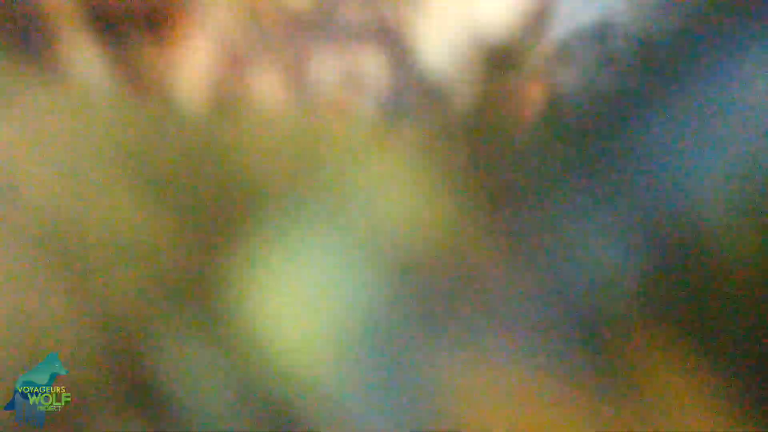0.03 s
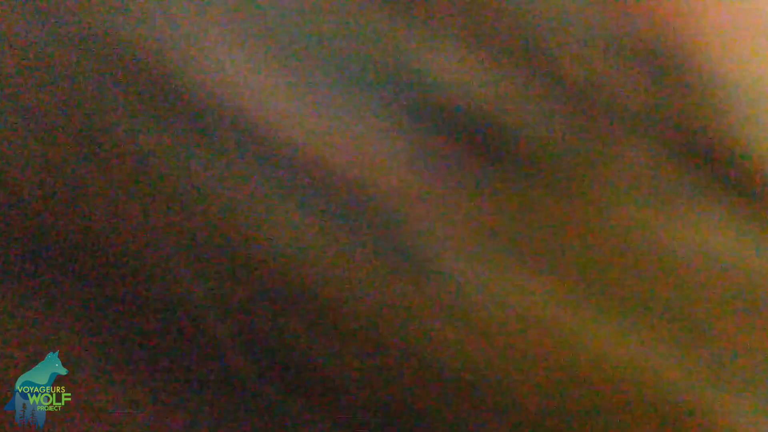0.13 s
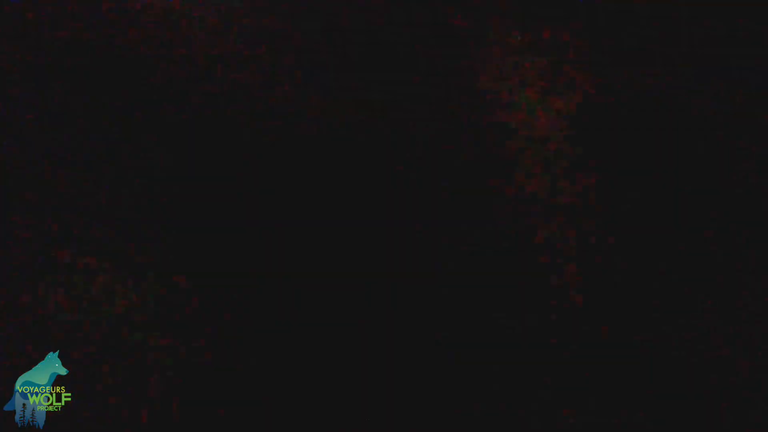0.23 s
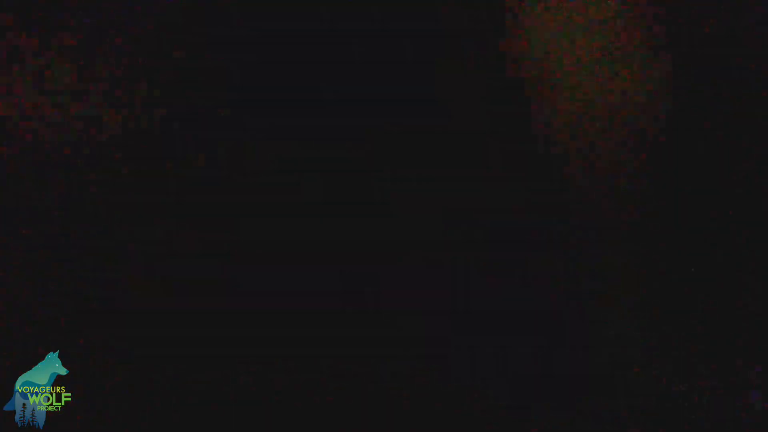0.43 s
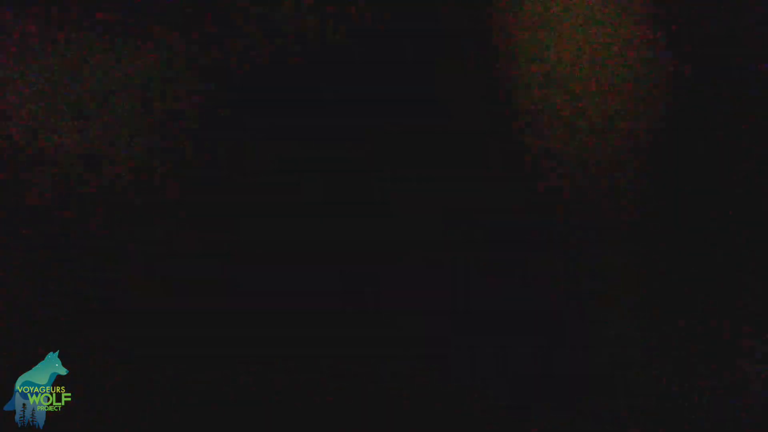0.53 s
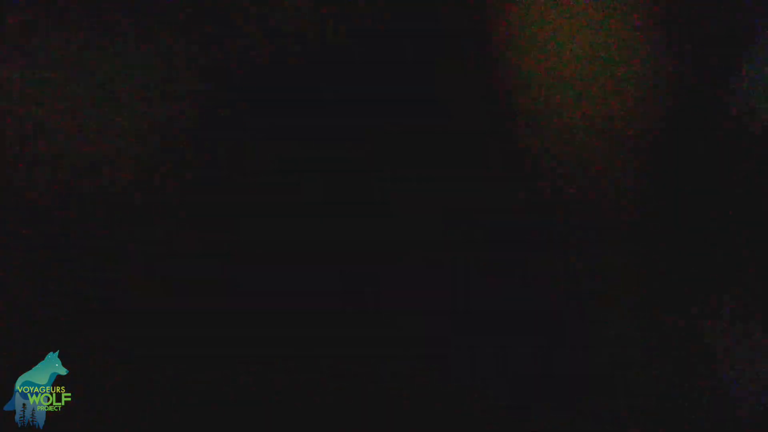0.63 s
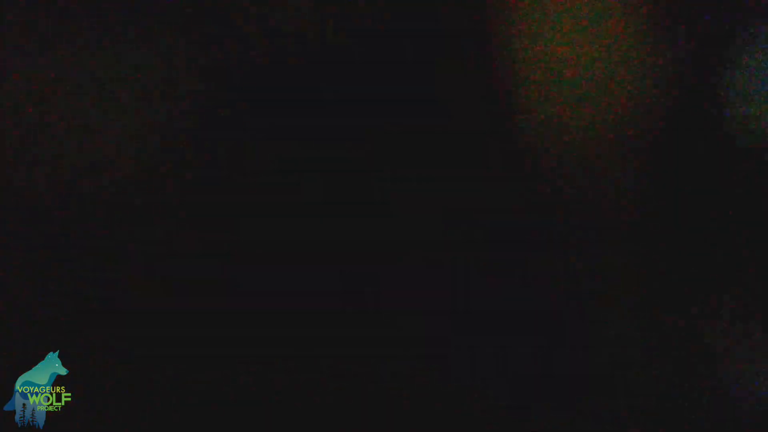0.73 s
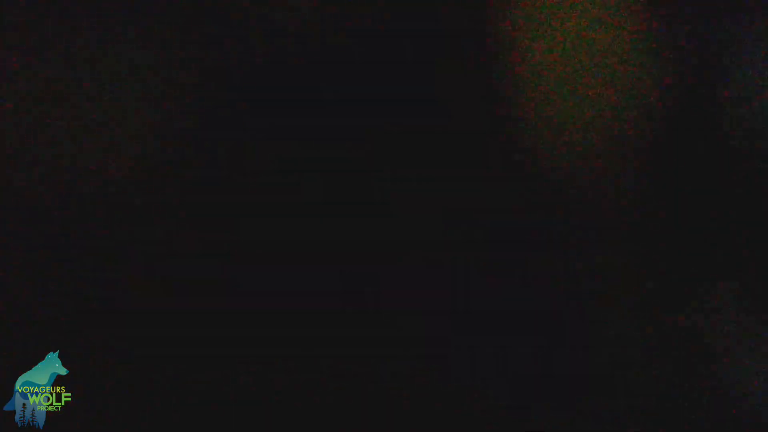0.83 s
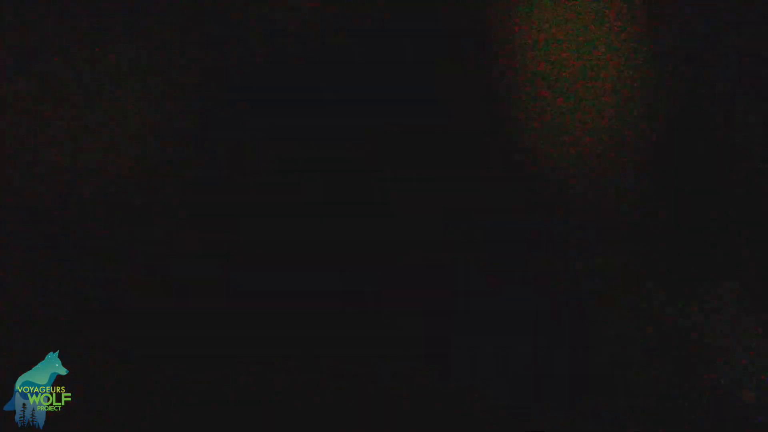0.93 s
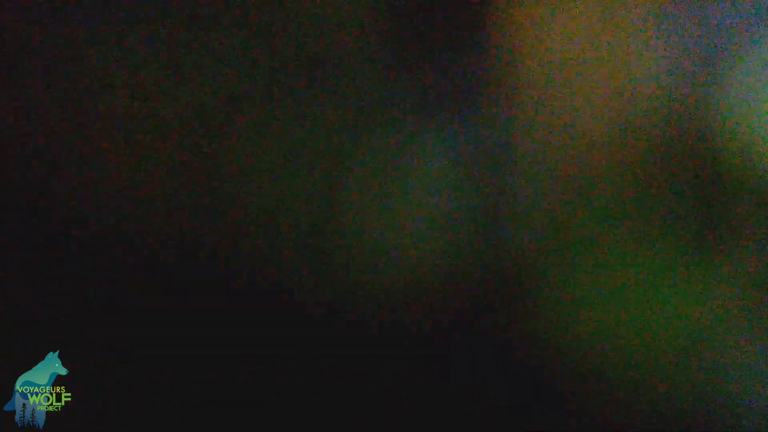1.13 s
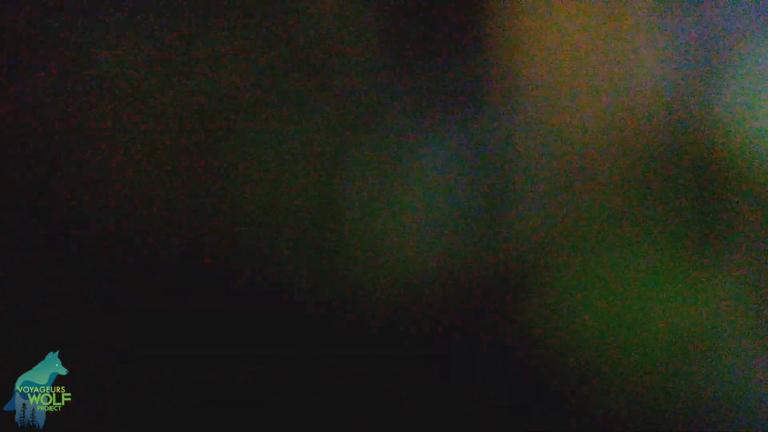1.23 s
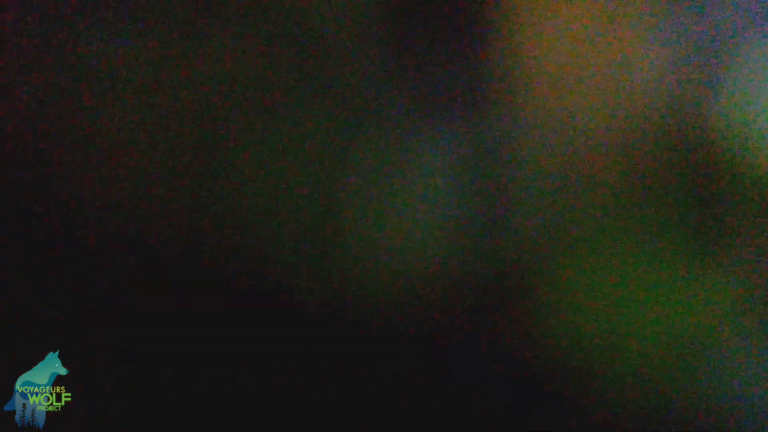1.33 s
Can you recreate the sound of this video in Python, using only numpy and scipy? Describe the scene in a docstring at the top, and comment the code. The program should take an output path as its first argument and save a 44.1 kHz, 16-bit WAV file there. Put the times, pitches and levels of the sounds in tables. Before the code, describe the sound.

A single sharp knock on a camera's plastic case, heard through its own microphone. Fingers rub and tap lightly from about 0.1 seconds. At 0.2 seconds the loud knock lands, ringing briefly and slightly overloading. Dry rubbing, dull thuds and light taps follow until 0.4 seconds, with faint ticks until 0.5. A low steady hiss and a barely audible high electronic whine run throughout and remain to the end.

```python
"""A knock on a camera

A hand shifts on a camera, then one sharp knock rings its plastic case and overloads the microphone.
Skin rubs as it sticks and slips, fingers tap and push with dull thuds, and small loose parts tick.
Under it all lie a steady low hiss and a faint electronic whine."""
import sys
import numpy as np
from scipy import signal
from scipy.fft import rfft, irfft
from scipy.io import wavfile

SR = 44100
rng = np.random.default_rng(int(sys.argv[2]) if len(sys.argv) > 2 else 0)


def dump(signal):
    """Clip the signal to [-1, 1] and save it as 16-bit WAV at the path in sys.argv[1]."""
    limited = np.clip(np.atleast_2d(signal).T, -1, 1)
    pcm = np.round(limited * 32767).astype(np.int16)
    wavfile.write(sys.argv[1], SR, pcm)


N = 61739
TIME = np.arange(N) / SR
RING_TIME = TIME[:SR // 6]  # seconds since a hit


def amp(db):
    """Turns decibels into a number to multiply by."""
    return 10 ** (np.asarray(db) / 20)


def unit(x):
    """Scales a sound to an average strength (rms) of 1."""
    return x / np.sqrt(np.mean(x ** 2) + 1e-20)


def level(points):
    """A volume curve through (t/s, level/dB) points, silent outside them."""
    return amp(np.interp(TIME, *np.transpose(points), left=-200, right=-200))


def colour(x, points):
    """Shapes bass and treble along (f/Hz, level/dB) points, at strength 1."""
    hz, db = np.transpose(points)
    f = np.fft.rfftfreq(len(x), 1 / SR)
    gain = amp(np.interp(np.log(f + 1), np.log(hz + 1), db))
    return unit(irfft(rfft(x) * gain, len(x)))


def resonance(hz, width_hz):
    """The feedback numbers of a filter that rings at one pitch."""
    r = np.exp(-np.pi * width_hz / SR)
    return [1, -2 * r * np.cos(2 * np.pi * hz / SR), r * r]


def band(x, hz, width_hz):
    """Keeps the sound near one pitch, at strength 1."""
    return unit(signal.lfilter([1, 0, -1], resonance(hz, width_hz), x))


def soften(x, hz):
    """Turns down the treble above hz."""
    return signal.lfilter(*signal.butter(2, hz, fs=SR), x)


def cut_bass(x, hz):
    """Turns down the bass below hz."""
    return signal.lfilter(*signal.butter(2, hz, "high", fs=SR), x)


def add(mix, start_s, sound):
    """Adds a sound to the mix at a given time."""
    part = mix[round(start_s * SR):][:len(sound)]
    part += sound[:len(part)]


def fade(t60):
    """Dies away by 60 dB in t60 seconds."""
    return np.exp(-np.log(1000) * RING_TIME / t60)


def hiss():
    """A steady, low background hiss."""
    # tone of the hiss: f/Hz, level/dB
    hiss_colour = [(25, -32), (60, -20.5), (100, -16.5), (200, -9), (330, -5.5), (500, -1), (950, 0),
                   (1600, -3), (2500, -8), (3500, -17), (5000, -31), (6500, -41), (8500, -47.5),
                   (14000, -43.5), (16000, -60.5)]
    return amp(-55) * colour(rng.standard_normal(N), hiss_colour)


def whine():
    """A thin electronic tone whose pitch wavers slightly."""
    waver = unit(soften(rng.standard_normal(N), hz=68))
    pitch_hz = 7805 + 28 * waver
    return amp(-93.5) * unit(np.sin(2 * np.pi * np.cumsum(pitch_hz) / SR))


def case_ring(hollow_db=0):
    """The plastic case rings after one touch; hollow_db turns its lowest note up or down."""
    # the case's own notes: f/Hz, level/dB, fade time t60/s
    case_notes = [(664.5, -12.5, .032), (776, -17, 0.083), (965, -8, 0.022), (1103, -8.5, 0.028),
                  (1217, -16, 0.089), (1420, 1.5, 0.011), (1510, -21, 0.02), (1774, 0, 0.016),
                  (1980, -21.5, 0.04), (2520, -28.5, 0.032), (2775, -10, 0.021), (3400, -16, 0.0293),
                  (3950, -25, 0.054)]
    notes = [amp(db) * fade(t60) * np.sin(2 * np.pi * hz * RING_TIME) for hz, db, t60 in case_notes]
    ring = cut_bass(amp(hollow_db) * notes[0] + sum(notes[1:]), hz=544)
    # bending waves in the plastic spread the first swing over a millisecond
    spread = resonance(hz=1366, width_hz=607)
    return signal.lfilter(spread[::-1], spread, ring)


def rubbing():
    """Skin sticks and slips on the case: many tiny jolts make it ring, rumble and scratch."""
    # pressure of the hand: t/s, level/dB
    pressure = [(.05, -72), (.112, -49.5), (.123, -38), (.148, -37.5), (.159, -53), (.2, -58.5),
                (.210, -37), (.236, -40), (.25, -45), (.277, -38.5), (.301, -44.5), (.313, -64),
                (.345, -62), (.42, -60)]
    # tone of the grip's low rumble: f/Hz, level/dB
    rumble_colour = [(25, -2.5), (70, -7), (200, -3), (400, -26), (1000, -40), (16000, -91)]
    # tone of the skin's dry scratch: f/Hz, level/dB
    scratch_colour = [(300, -24), (2000, 3.5), (3500, 3), (5800, -5.5), (7500, -17), (12000, -22.5),
                      (15500, -25.5)]
    # loudness of that scratch: t/s, level/dB
    scratch_level = [(.08, -85), (.125, -58.5), (.16, -73.5), (.186, -71), (.2, -45.5), (.23, -50.5),
                     (.277, -53.5), (.29, -63), (.338, -60.5), (.37, -77), (.55, -79)]
    slips_per_s, spread_db = 3500, 4.5
    slips = (rng.random(N) < slips_per_s / SR) * rng.choice([-1, 1], N)
    slips = slips * amp(spread_db * np.minimum(rng.exponential(1, N), 2))  # some jolt harder
    ring = unit(soften(signal.fftconvolve(slips, case_ring())[:N], hz=900))
    rumble = amp(-22) * colour(slips, rumble_colour)
    scratch = colour(slips, scratch_colour)
    return (ring + rumble) * level(pressure) + scratch * level(scratch_level)


def blows():
    """Each blow cracks and rings the case, with its own loudness and brightness."""
    # light taps, and a knock of three hits within 3 ms:
    # t/s, level/dB, treble cut-off/Hz, boost of the lowest note/dB
    hits = [(0.1221, -33, 1500, 0), (.1330, -30.5, 915, 5.5), (.1422, -31, 800, 5), (.2152, -10, 3300, 7),
            (0.2163, -2, 2500, 3.5), (.21823, -10, 2690, -6), (0.2595, -27.5, 1200, -16),
            (.2672, -32.5, 1480, -9), (.2944, -32.5, 1400, -11), (.3060, -34, 4500, -1),
            (.3810, -31, 1500, 11)]
    # tone of the crack: f/Hz, level/dB
    crack_colour = [(100, -6.5), (1500, -7.5), (3000, -17), (3900, -11.5), (4400, -17.5), (5100, 3.5),
                    (5800, -0.5), (6600, -14.5), (10000, -2.5), (12500, 3.5), (15500, 8)]
    out = np.zeros(N)
    for start_s, db, cutoff_hz, hollow_db in hits:
        noise = rng.standard_normal(len(RING_TIME))
        crack = amp(1) * colour(noise, crack_colour) * fade(t60=0.0219)
        add(out, start_s, amp(db) * soften(case_ring(hollow_db) + crack, cutoff_hz))
    return out


def pushes():
    """The whole camera gives under the hand with a short, low thud."""
    # pushes of the hand: t/s, level/dB
    shoves = [(0.143, -47), (0.2174, -14), (0.273, -39), (.2770, -23.5), (0.2863, -24.5)]
    thud_hz, rise_s = 189, 0.0015
    rise = 1 - np.exp(-RING_TIME / rise_s)
    thud = rise * fade(t60=0.014) * np.sin(2 * np.pi * thud_hz * RING_TIME)
    out = np.zeros(N)
    for start_s, db in shoves:
        add(out, start_s, -amp(db) * thud)
    return cut_bass(out, hz=110)


def ticks():
    """Small loose parts snap and ring briefly, each at its own pitch."""
    # ticks of the parts: t/s, level/dB, f/Hz, fade time t60/s
    loose_parts = [(0.1881, -38.5, 3500, 0.0099), (0.2526, -52, 4220, .012), (0.2756, -45.5, 5460, 0.011),
                   (0.3056, -39, 5100, 0.012), (0.3445, -51.5, 5000, 0.012), (0.344, -48.5, 10400, 0.0083),
                   (0.4031, -62, 7800, 0.0086), (0.4075, -58, 6140, 0.014), (0.4653, -65, 4740, 0.011),
                   (0.5119, -49, 6600, .01)]
    out = np.zeros(N)
    for start_s, db, hz, t60 in loose_parts:
        noise, snap = rng.standard_normal((2, len(RING_TIME)))
        width_hz = 0.26 * hz
        ring = band(band(noise, hz, width_hz), hz, width_hz)
        add(out, start_s, amp(db) * fade(t60) * (ring + amp(-17) * snap))
    return out


def scene():
    """All the sounds added together in one channel."""
    return (hiss() + whine() + rubbing() + blows() + pushes() + ticks())[None]


def record(dry):
    """The microphone overloads, rounding off loud peaks; then the highest treble is cut."""
    ceiling, hardness, top_hz = 0.52, 4, 16000
    clipped = dry / (1 + abs(dry / ceiling) ** hardness) ** (1 / hardness)
    treble_cut = signal.firwin(255, top_hz, window=("kaiser", 9), fs=SR)
    return signal.oaconvolve(clipped, treble_cut[None], "same")


dry = scene()
out = record(dry)
dump(out)
```